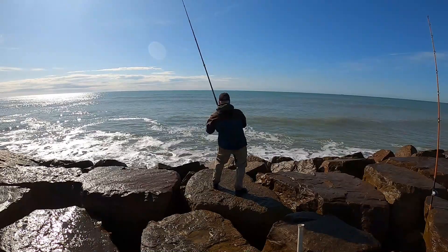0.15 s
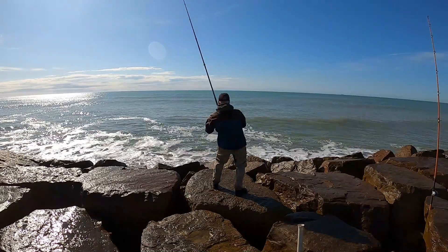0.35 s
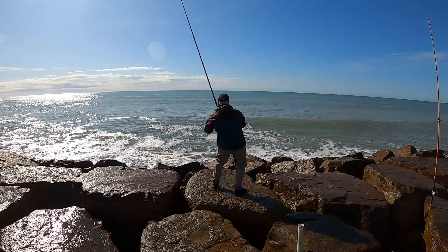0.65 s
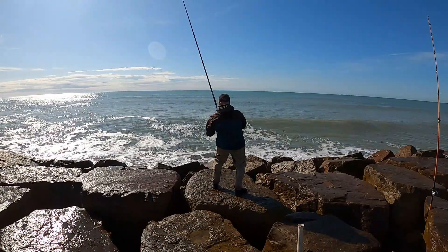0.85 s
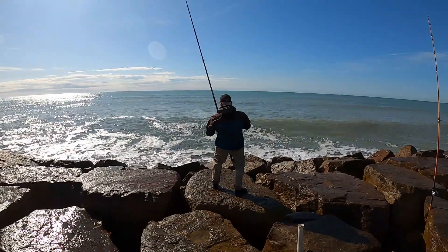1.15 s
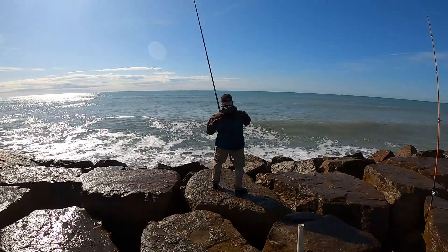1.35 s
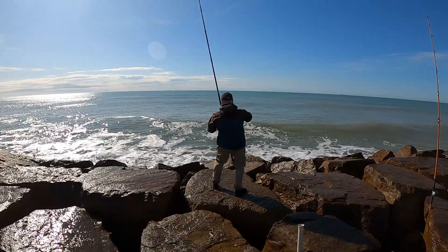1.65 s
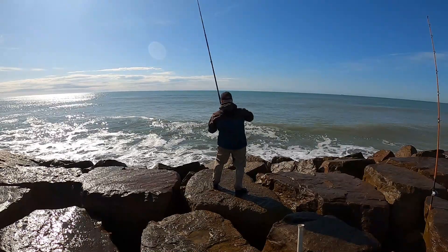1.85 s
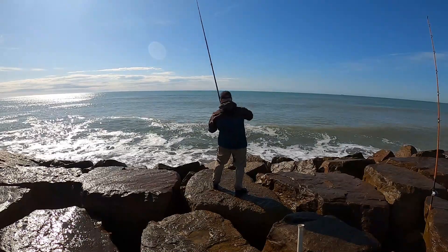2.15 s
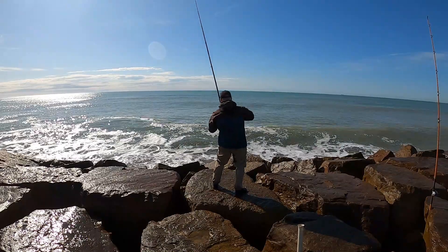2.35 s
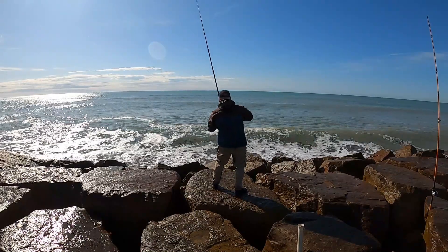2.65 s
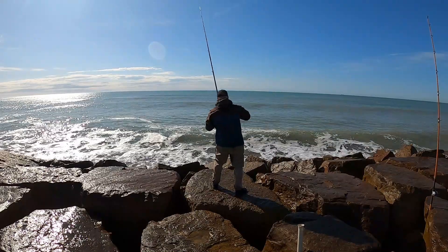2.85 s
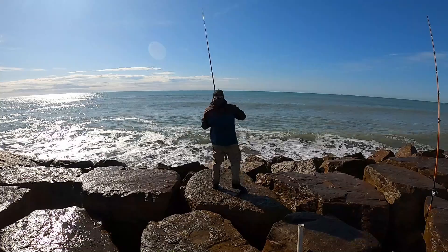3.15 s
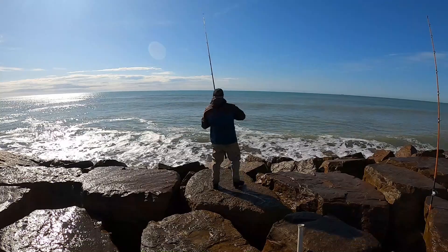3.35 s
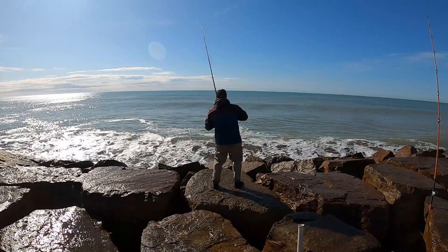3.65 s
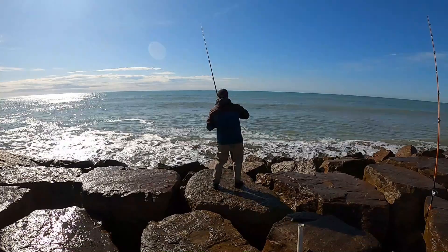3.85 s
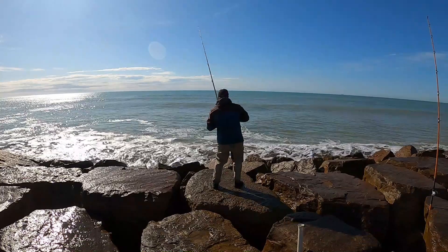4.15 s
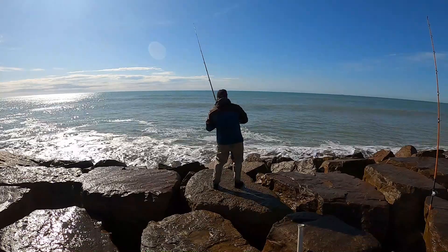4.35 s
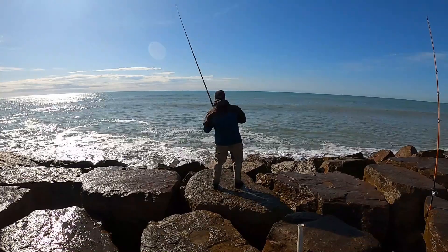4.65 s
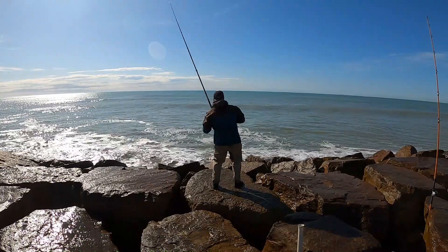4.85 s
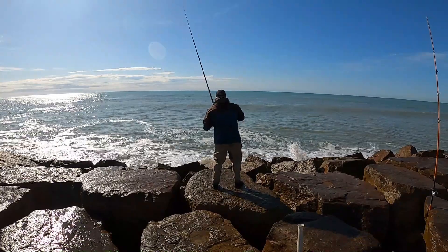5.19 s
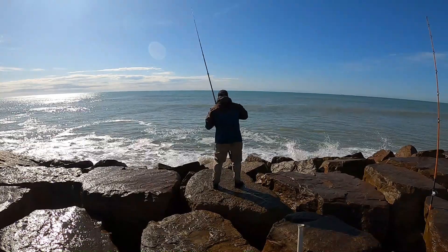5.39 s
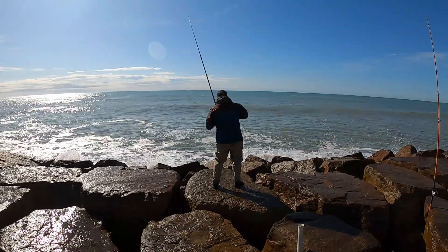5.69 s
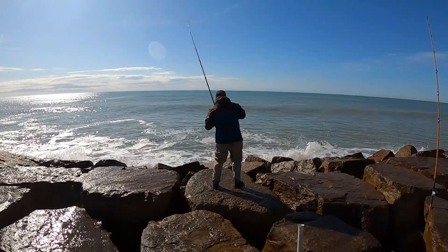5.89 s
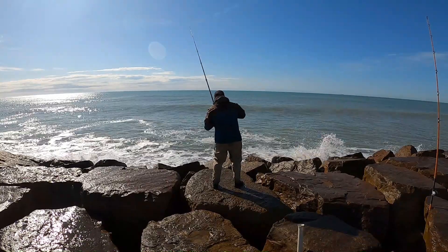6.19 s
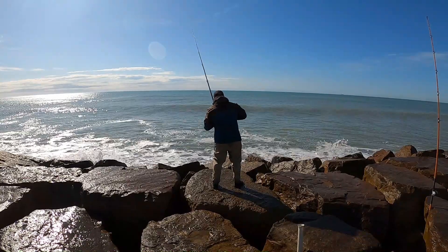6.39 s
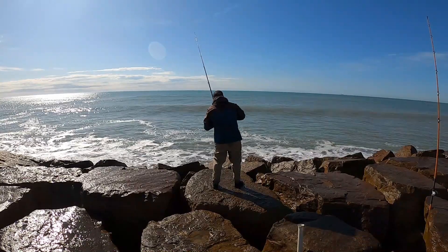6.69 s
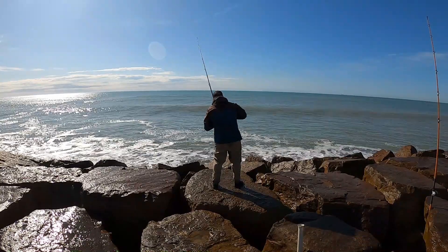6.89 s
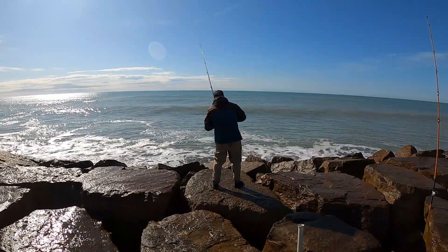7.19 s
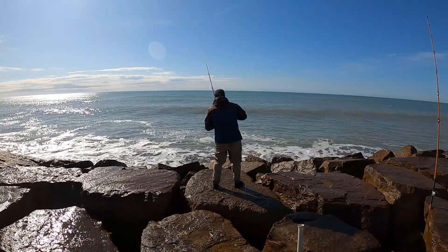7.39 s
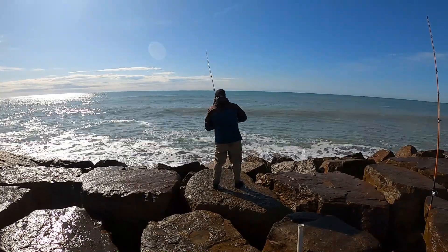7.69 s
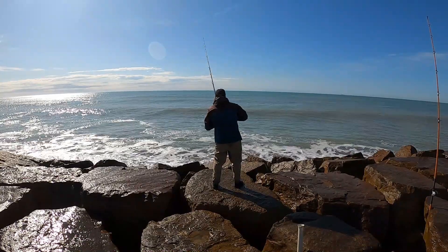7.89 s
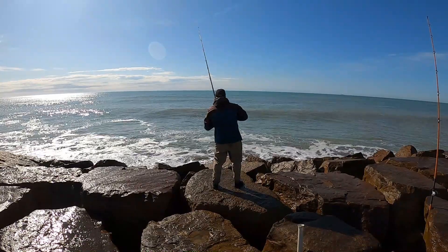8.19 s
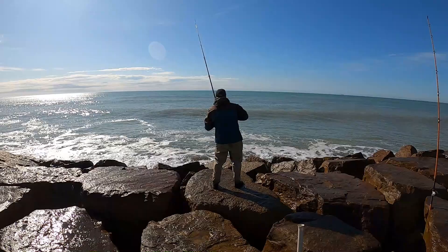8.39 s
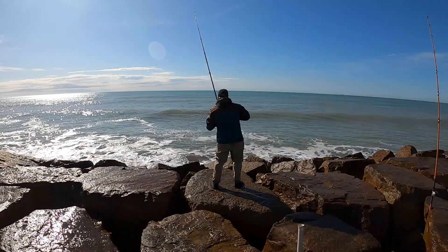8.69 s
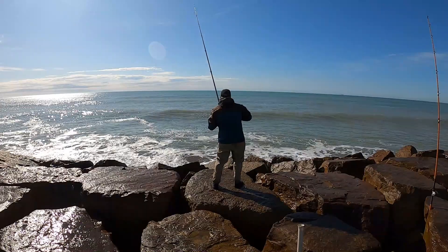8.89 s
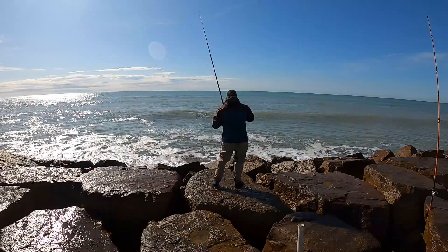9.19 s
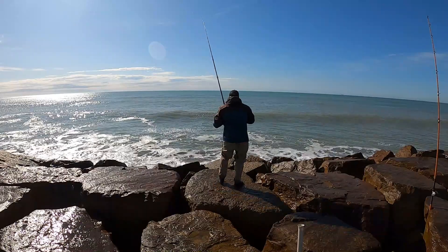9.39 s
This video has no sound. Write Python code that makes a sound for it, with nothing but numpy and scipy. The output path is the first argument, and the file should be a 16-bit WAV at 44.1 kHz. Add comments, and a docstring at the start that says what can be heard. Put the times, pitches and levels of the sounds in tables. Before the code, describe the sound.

Gusty wind rumbles and flutters on the microphone while waves roar and hiss over boulders, one booming with pattering spray; a reel ticks faintly at first.

```python
"""A boulder shore in gusty wind: waves roar and hiss in coloured noise and clouds of damped sines.
The biggest one booms on the rocks; spray patters, blobs slap as noise bursts and drips plink as gliding sines.
Wind on the microphone is shaped noise: a surging rumble, a flutter, a rustle and short banded flurries.
A fishing reel ticks faintly for a few turns, in short bursts of coloured noise."""
import sys
import numpy as np
from scipy import signal
from scipy.fft import rfft, irfft, next_fast_len
from scipy.io import wavfile
from scipy.ndimage import uniform_filter1d, map_coordinates

SR = 44100
rng = np.random.default_rng(int(sys.argv[2]) if len(sys.argv) > 2 else 0)


def store_pcm(level_fs):
    """Save levels as 16-bit WAV."""
    pcm = np.round(np.clip(level_fs, -1, 1) * 32767).astype(np.int16)
    wavfile.write(sys.argv[1], SR, np.atleast_2d(pcm).T)


N = 420713
T = np.arange(N) / SR  # time of each sample, s
WAVE_SHAPE = 1.33  # exponent of a wave's swell: 2 = a rounded crest, 1 = a pointed one


def amp(db):
    """Decibels to gain."""
    return 10 ** (np.asarray(db) / 20)


def unit(x):
    """x at rms 1."""
    return x / np.sqrt(np.mean(x ** 2) + 1e-20)


def white():
    """White noise as long as the scene."""
    return rng.standard_normal(N)


def curve(rows):
    """(time, value) points joined by straight lines, one value per sample."""
    s, value = np.transpose(rows)
    return np.interp(T, s, value)


def wobble(rate):
    """A smooth random curve, rate knots a second."""
    knots = rng.standard_normal(int(N * rate / SR) + 4)
    return map_coordinates(knots, [T * rate])


def swell(crest, rise, fall, shape):
    """A gain that climbs to 1 at the crest and dies away again; rise and fall set its widths."""
    age = T - crest
    return np.exp(-np.abs(age / np.where(age < 0, rise, fall)) ** shape / 2)


def together(gains):
    """The joint gain of unrelated noises: their powers add."""
    return np.sqrt(sum(g ** 2 for g in gains))


def filtered(x, response):
    """x times a response of frequency, padded so that its end does not wrap round."""
    m = next_fast_len(N + SR // 2)
    hz = np.fft.rfftfreq(m, 1 / SR)
    return irfft(rfft(x, m) * response(hz), m)[:N]


def coloured(x, spectrum):
    """x through (Hz, dB) points joined on a log axis."""
    f, db = np.transpose(spectrum)
    return filtered(x, lambda hz: amp(np.interp(np.log(hz + 1), np.log(f), db)))


def steadied(x, span):
    """x at rms 1, with its swells longer than span seconds evened out."""
    power = np.abs(uniform_filter1d(x ** 2, max(int(span * SR), 2)))
    return unit(x / np.sqrt(power + 1e-12))


def band_noise(low_hz, high_hz, order, span):
    """One second of even noise in a band."""
    band = signal.butter(order, [low_hz, min(high_hz, SR / 2 - 1)], "band", fs=SR, output="sos")
    return steadied(signal.sosfilt(band, rng.standard_normal(SR)), span)


def rush(patchy_db):
    """White noise with patches of random gain in time and frequency."""
    z = signal.stft(white(), nperseg=512)[2]
    field = uniform_filter1d(rng.standard_normal(z.shape), size=7, axis=0)  # across frequency
    field = uniform_filter1d(field, size=14, axis=1)  # across time
    patched = z * amp(patchy_db * unit(field))
    return unit(signal.istft(patched, nperseg=512)[1][:N])


def bubbles(count, pitch_hz, spread, cycles, size_db):
    """A cloud of damped sines of random size, each rising in pitch as it dies."""
    start = rng.integers(0, N, count)
    hz = np.clip(pitch_hz * np.exp(spread * rng.standard_normal((count, 1))), 200, 12000)
    size = amp(size_db * np.minimum(rng.exponential(size=(count, 1)), 5))
    k = np.arange(256)  # samples in one ring
    life = np.minimum(cycles / hz, len(k) / SR)
    age = k / SR / life
    decay = np.exp(-np.log(100) * age)  # down 40 dB over one life
    ring = size * np.sin(2 * np.pi * hz * k / SR * (1 + age / 10)) * decay
    places = start[:, None] + k
    return unit(np.bincount(places.ravel(), ring.ravel(), N + len(k))[:N])


def wind():
    """Pressure swings rumble; smaller eddies flutter as the swings peak, the smallest rustle in flickers."""
    # wind strength, heard relative to its mean: t/s, level/dB
    strength = [(0, -17), (.4, -18.5), (1.0, -20), (1.55, -22), (1.85, -22), (2.35, -24.5), (2.7, -22),
                (3.25, -18.5), (3.75, -20.5), (4.15, -19.5), (4.8, -21.5), (5.1, -21.5), (6.1, -18.5),
                (6.5, -23), (7.6, -20.5), (7.95, -22), (8.85, -19.5), (9.3, -24)]
    # level of the rustle before the lulls: t/s, level/dB
    rustle_level = [(0, -36.5), (.6, -36.5), (1.1, -35), (1.45, -39.5), (1.85, -35), (2.25, -39.5),
                    (2.95, -35), (3.12, -39.5), (3.32, -36), (3.7, -39), (4.3, -38), (5.0, -43),
                    (5.35, -34.5), (6.6, -36), (7.6, -34), (7.9, -35), (8.2, -36), (8.5, -36), (8.8, -32.5),
                    (9.15, -41.5), (9.54, -34.5)]
    # brief dips of the wind: t/s, depth/dB (negative = a rise)
    lulls = [(.16, 1), (.39, 1.5), (.73, 4), (1.54, 3.5), (1.99, -0.5), (2.25, 5), (2.45, 0.5), (3.61, 2),
             (3.76, 4), (3.98, 0), (4.42, 1.5), (4.7, 4.5), (4.92, 2.5), (5.13, 4.5), (6.29, 4), (6.46, 2),
             (7.33, 3.5), (7.83, 2.5), (7.92, 1), (8.43, 3), (8.53, 3), (9.08, -0.5), (9.3, 0.5)]
    # brief surges of the rumble alone: t/s, rise/dB (negative = a dip)
    surges = [(.32, 3), (1.32, 0), (1.83, 4), (2.11, 4), (3.33, 1), (3.88, 1), (4.12, -1), (4.61, 0),
              (4.79, 3.5), (6.15, 1), (6.669, 5.5), (7.53, 1), (8.14, -1), (8.36, -0.5), (8.83, -1),
              (8.95, 0.5), (9.51, 4)]
    # tone curves of the large, middling and small eddies: f/Hz, level/dB
    rumble_tone = [(8, -17.5), (20, 4), (35, -3), (55, 0.5), (75, -2), (120, -5), (160, -13), (260, -28.5),
                   (600, -72)]
    flutter_tone = [(60, -20.5), (120, -9.5), (165, 1.5), (240, -0.5), (320, -4), (420, -10), (600, -22.5),
                    (1100, -41), (3000, -66)]
    rustle_tone = [(150, -26), (300, -3), (450, 5), (600, 0.5), (800, -7.5), (1100, -14.5), (1700, -25),
                   (2400, -37), (6000, -67.5)]
    rumble_db, flutter_db = -22.5, -32  # at mean wind strength
    flutter_grows = 0.91  # dB per dB of wind strength
    lull_s, surge_s = 0.019, 0.035  # half lengths

    strength_db = curve(strength)
    lull_db = sum(depth * swell(s, lull_s, lull_s, 2.2) for s, depth in lulls)
    surge_db = sum(rise * swell(s, surge_s, surge_s, 1.2) for s, rise in surges)
    gust_db = strength_db - strength_db.mean() - lull_db

    swing = steadied(coloured(white(), rumble_tone), span=.05)
    swing = unit(coloured(swing, [(10, -16.0), (25, -4.5)]))  # the slowest drift leaks past the diaphragm
    push = np.abs(swing)  # either way, a strong swing stirs the smaller eddies

    flutter = steadied(coloured(white(), flutter_tone), span=.06)
    flutter = unit(flutter * amp(1.0 * push + 0.57 * wobble(45) + 0.26 * wobble(16)))
    rustle = steadied(coloured(white(), rustle_tone), span=0.037)
    flicker_db = 0.87 * wobble(12) + 1.2 * wobble(30) + 1.6 * wobble(140)
    rustle = unit(rustle * amp(.7 * push + flicker_db))

    rumble = amp(rumble_db + gust_db + surge_db + 0.76 * wobble(16)) * swing
    flutter = amp(flutter_db + flutter_grows * gust_db) * flutter
    rustle = amp(curve(rustle_level) - 1.1 * lull_db) * rustle
    return rumble + flutter + rustle


def flurries():
    """Stronger eddies strike and fade: slow ones thump, fast ones brighten, each band sinking as it passes."""
    # eddies that hit the microphone, before flicker and tone: t/s, level/dB, half length/s, centre f/Hz
    eddies = [(.018, -28, 0.0057, 700), (0.047, -26.5, .006, 950), (0.059, -26, .016, 540),
              (.219, -27.5, 0.017, 1000), (0.239, -21.5, 0.006, 600), (.268, -26, .02, 174),
              (0.322, -27, 0.009, 1230), (0.346, -24.5, 0.015, 470), (0.416, -26, .006, 720),
              (0.462, -29, 0.006, 580), (.597, -26, .018, 160), (0.833, -29, 0.0078, 850),
              (0.902, -30, 0.0086, 650), (0.991, -28.5, 0.022, 467), (1.032, -27, .007, 840),
              (1.113, -28, 0.011, 660), (1.301, -24, .022, 159), (1.597, -24, 0.012, 174),
              (1.651, -23, .006, 577), (1.674, -24, .006, 574), (1.703, -26.5, 0.015, 430),
              (1.785, -26.5, 0.0083, 580), (1.871, -24.5, 0.0065, 680), (1.905, -27, 0.038, 380),
              (2.074, -26, 0.021, 188), (2.829, -23.5, 0.013, 616), (2.857, -27, .016, 450),
              (2.871, -25.5, 0.0089, 230), (3.029, -25.5, 0.054, 130), (3.372, -30.5, .011, 1100),
              (3.408, -22, .015, 140), (3.528, -25, 0.032, 155), (3.619, -26, .005, 680),
              (3.636, -25.5, 0.009, 685), (3.64, -34, .012, 1250), (4.295, -25.5, .016, 320),
              (4.497, -27, 0.014, 240), (5.644, -23, 0.017, 175), (5.758, -21, .018, 192),
              (5.842, -28.5, .04, 850), (5.888, -19.5, .013, 210), (6.191, -22.5, .015, 480),
              (6.35, -22, 0.015, 178), (6.599, -28, .008, 850), (6.619, -25.5, .012, 497),
              (7.05, -24.5, .006, 720), (7.063, -25, .01, 680), (7.085, -26, .007, 1150),
              (7.109, -27, .008, 540), (7.215, -26.5, 0.016, 320), (7.46, -25, 0.024, 160),
              (7.513, -22.5, 0.006, 660), (7.56, -25.5, .022, 180), (7.715, -26.5, .008, 546),
              (8.071, -26.5, 0.021, 606), (8.118, -29, 0.0063, 430), (8.162, -28, 0.0096, 191),
              (8.31, -33, 0.0093, 480), (8.593, -26.5, 0.0066, 616), (8.712, -24, .018, 516),
              (8.779, -22.5, 0.017, 480), (8.804, -19, .03, 201), (8.95, -24, 0.033, 162),
              (9.461, -28.5, .02, 159)]
    rise, fall = 0.54, 1.46  # in half lengths
    below, above = 2.4, 1.35  # the band reaches this factor below and above its centre
    even_cycles = 3.3  # the push stays even over this many cycles
    sag = .2  # share by which the band starts high and ends low

    out = np.zeros(N)
    for s, db, half, hz in eddies:
        near = np.abs(T - s) < 5 * half
        age = T[near] - s
        width = half * np.where(age < 0, rise, fall)
        push = np.exp(-(age / width) ** 2 / 2)
        air = band_noise(hz / below, hz * above, order=3, span=even_cycles / hz)
        # the noise is read ever more slowly, so its band sinks
        travel = SR // 4 + np.cumsum(1 - sag * np.tanh(age / half))
        out[near] += amp(db) * push * np.interp(travel, np.arange(SR), air)
    flickering = out * amp(0.78 * wobble(160))
    return coloured(flickering, [(300, -0.5), (900, -5.0), (1600, -5), (2500, -3.5), (6000, -24.5)])


def reel():
    """The reel's mechanism ticks softly once a turn: noise with a quick attack and a decay."""
    # ticks: t/s, level/dB
    turns = [(.007, -36), (.123, -39.5), (.241, -39), (.356, -40), (.473, -42), (1.077, -39), (1.199, -44)]
    # tone curve of a tick: f/Hz, level/dB
    tick_tone = [(1500, -25), (3200, -3), (4000, 9.5), (5000, -3), (6200, 4.5), (7000, -11), (8000, -2),
                 (11000, -6), (15000, -15)]
    rise_s, t60_s = .0005, .028  # attack time constant, time to fall 60 dB

    strength = np.zeros(N)
    for s, db in turns:
        age = np.clip(T - s, 0, 1)
        strength += amp(db - 60 * age / t60_s) * (1 - np.exp(-age / rise_s))
    return strength * unit(coloured(white(), tick_tone))


def drips():
    """Drops plink into pools between the rocks: each traps a small bubble that rings and rises in pitch."""
    # single drops: t/s, level/dB, starting pitch f/Hz
    plinks = [(3.334, -39, 3380), (4.583, -39, 4270)]
    rise_s, t60_s = .001, 0.033  # attack time constant, time to fall 60 dB
    glide = 1.5  # pitch climb, share per second

    out, t = np.zeros(N + SR), np.arange(SR // 10) / SR
    shape = (1 - np.exp(-t / rise_s)) * amp(-60 * t / t60_s)
    for s, db, hz in plinks:
        ring = np.sin(2 * np.pi * hz * t * (1 + glide * t / 2))
        out[round(s * SR):][:len(t)] += amp(db) * shape * ring
    return out[:N]


def slaps():
    """Larger blobs of spray snap on the stone, each at its own pitch, and scatter."""
    # blobs, before the tone curve: t/s, level/dB, centre f/Hz
    blobs = [(6.6675, -30, 3000), (6.744, -27, 4500), (6.748, -31, 2400), (6.7677, -24.5, 2700),
             (6.7965, -22, 3300), (6.806, -32, 2800), (6.92, -36, 5000)]
    # tone curve of the slaps: f/Hz, level/dB
    slap_tone = [(700, -3), (1700, 5), (5200, -0.5), (5900, -10), (7500, -13), (13000, -16)]
    rise_s, t60_s = 0.00046, 0.0091  # the snap: attack time constant, time to fall 60 dB
    scatter_db, scatter_t60_s = -15, 0.15  # the fragments' longer tail, relative to the snap
    reach = 2.1  # the band reaches this factor below and above its centre

    out, t = np.zeros(N + SR), np.arange(SR // 4) / SR
    snap = amp(-60 * t / t60_s)
    scatter = amp(scatter_db - 60 * t / scatter_t60_s)
    shape = (1 - np.exp(-t / rise_s)) * (snap + scatter)
    for s, db, hz in blobs:
        splash = band_noise(hz / reach, hz * reach, order=2, span=.001)
        out[round(s * SR):][:len(t)] += amp(db) * shape * splash[-len(t):]
    return coloured(out, slap_tone)[:N]


def spray():
    """Sheets of droplets patter on the boulders; the level flickers as clumps of drops land."""
    # sheets: peak t/s, rise/s, fall/s, level/dB
    sheets = [(1.08, 0.072, 0.18, -55), (5.29, 0.077, 0.27, -48), (5.82, 0.06, 0.45, -42),
              (6.55, 0.046, 0.3, -41), (6.93, 0.03, 0.064, -44), (7.03, 0.057, .04, -45)]
    # tone curve of the droplets: f/Hz, level/dB
    droplet_tone = [(1000, -13), (2000, -1), (2900, 0.5), (4200, -2.5), (5350, -4.5), (5750, -21.5),
                    (7100, -18.5), (8300, -10), (11000, -14.5), (14000, -29)]
    clump_db = .7  # depth of the flicker

    landing = together(amp(db) * swell(s, rise, fall, 1.3) for s, rise, fall, db in sheets)
    drops = rush(patchy_db=-0.5)
    drops = drops + amp(-3.5) * bubbles(count=9000, pitch_hz=3460, spread=0.5, cycles=3.0, size_db=2.5)
    return landing * amp(clump_db * wobble(28)) * unit(coloured(drops, droplet_tone))


def boom():
    """Air trapped under the biggest wave booms as it hits the boulders: low noise in one swell."""
    # the one boom: crest t/s, rise/s, fall/s, level/dB
    s, rise, fall, db = (6, 0.56, 0.83, -27.5)
    # tone curve of the boom: f/Hz, level/dB
    boom_tone = [(50, -18.5), (110, -1), (170, 2.5), (260, -1), (400, -6), (600, -19), (1100, -26),
                 (3000, -61)]

    air = steadied(coloured(white(), boom_tone), span=0.058)
    return amp(db + 2.2 * wobble(25)) * swell(s, rise, fall, WAVE_SHAPE) * air


def surf():
    """Waves swell and drain: tumbling water roars with large bubbles, foam hisses and fizzes with small ones."""
    # waves running up the rocks: crest t/s, rise/s, fall/s, roar level/dB, foam level/dB
    breakers = [(.1, 0.44, 0.28, -38.5, -48), (1.1, 0.51, 1.3, -38.5, -45.5), (2.9, 0.78, 0.42, -40, -51),
                (4.25, 0.32, 0.22, -50, -48), (5.8, 0.66, 1.27, -36, -43), (8.6, 0.58, 0.76, -38.5, -46),
                (9.45, 0.27, 0.45, -38.5, -51)]
    # tone curves of the roar, the foam and the fizz: f/Hz, level/dB
    roar_tone = [(150, -15.5), (400, -0.5), (700, 1), (1000, -0.5), (1500, -3.5), (2000, -9.5), (2800, -19),
                 (5000, -40.5), (9000, -74.5)]
    foam_tone = [(900, -20.5), (1700, 0.5), (2400, -0.5), (3300, -2), (4300, -5), (5350, -8.5),
                 (5700, -17.5), (7000, -19.5), (10000, -19.5), (14000, -36.5)]
    fizz_tone = [(3000, -24), (5000, 2.5), (5800, 1), (7000, -3), (8500, -12), (11000, -14), (14000, -25.5)]
    shore_roar_db, shore_foam_db = -42.5, -52.5  # the rest of the shore, always there
    fizz_db, fizz_full_db = -57, -49.5  # fizz ceiling, and the foam level around which it levels off
    foam_lag_s = .03  # the foam hisses just after the water tumbles

    tumbling, foaming = [amp(shore_roar_db)], [amp(shore_foam_db)]
    for s, rise, fall, roar_db, foam_db in breakers:
        tumbling.append(amp(roar_db) * swell(s, rise, fall, WAVE_SHAPE))
        foaming.append(amp(foam_db) * swell(s + foam_lag_s, rise, fall, WAVE_SHAPE))
    tumbling, foaming = together(tumbling), together(foaming)

    churn = rush(patchy_db=0.0)
    churn = churn + amp(-15) * bubbles(count=9000, pitch_hz=1512, spread=0.46, cycles=7, size_db=1.5)
    froth = rush(patchy_db=1.0)
    froth = froth + amp(-15.5) * bubbles(count=9000, pitch_hz=3680, spread=0.4, cycles=5.5, size_db=1.0)

    roar = tumbling * unit(coloured(churn, roar_tone))
    foam = foaming * amp(0.24 * wobble(9.7)) * unit(coloured(froth, foam_tone))
    fizzing = amp(fizz_db + 0.3 * wobble(12)) * np.tanh(foaming / amp(fizz_full_db))
    fizz = fizzing * unit(coloured(rush(patchy_db=1.3), fizz_tone))
    return roar + foam + fizz


def scene():
    """Everything meets at one microphone."""
    weather = wind() + flurries()
    water = surf() + boom() + spray() + slaps() + drips()
    return (weather + water + reel())[None]


def record(dry):
    """The microphone dulls the top octave and keeps nothing above its band limit."""
    # the microphone's dull top: f/Hz, level/dB
    dull_top = [(6900, 0.5), (7400, -3.5), (8100, -13), (10000, -16.5), (12000, -20), (15000, -26.5)]
    top_hz = 15100  # band limit
    return filtered(coloured(dry[0], dull_top), lambda hz: hz < top_hz)[None]


dry = scene()
out = record(dry)
store_pcm(out)
```